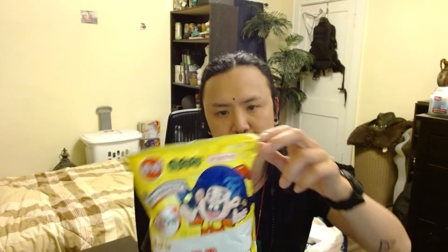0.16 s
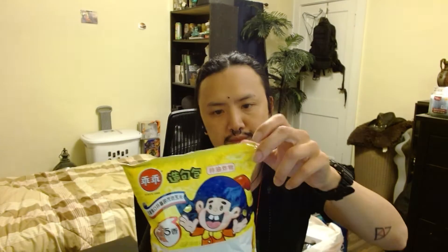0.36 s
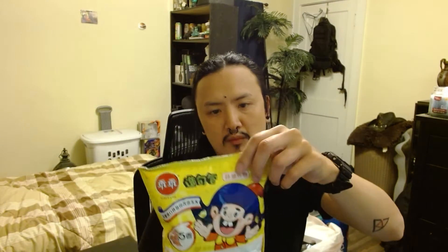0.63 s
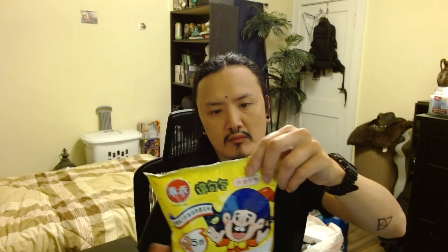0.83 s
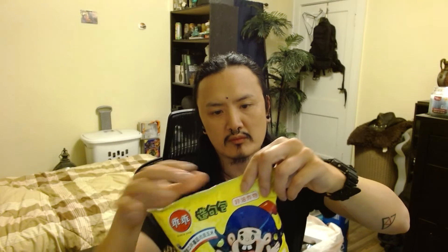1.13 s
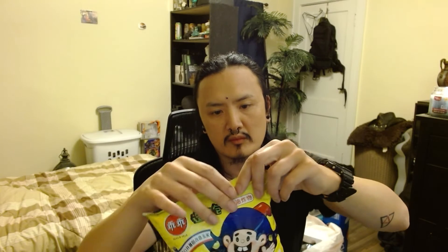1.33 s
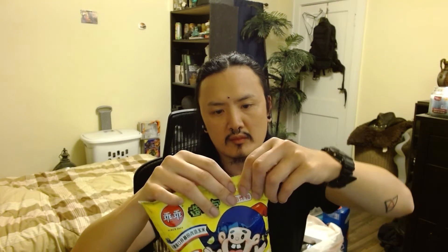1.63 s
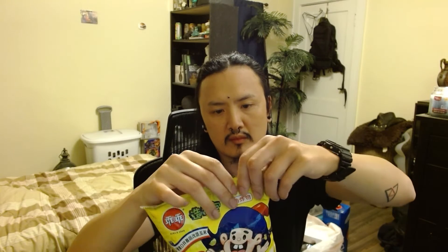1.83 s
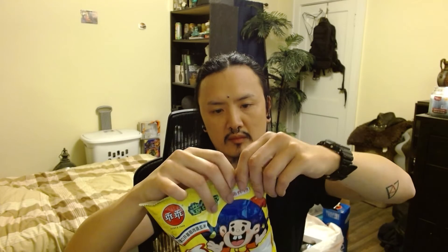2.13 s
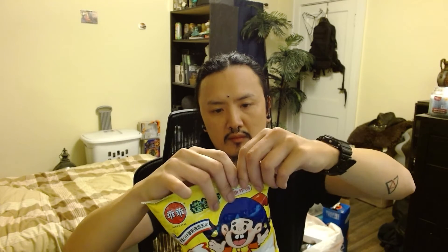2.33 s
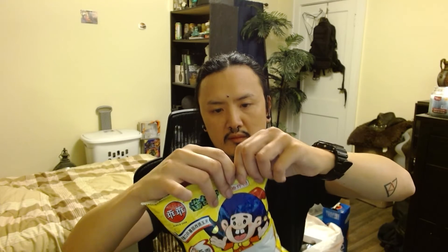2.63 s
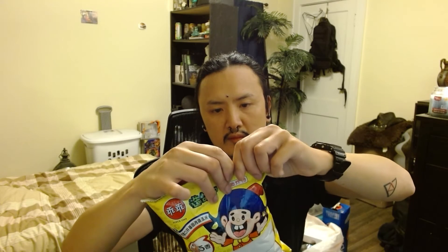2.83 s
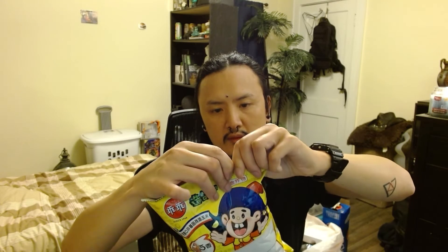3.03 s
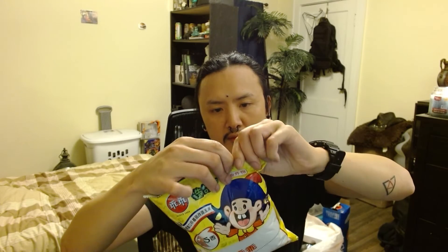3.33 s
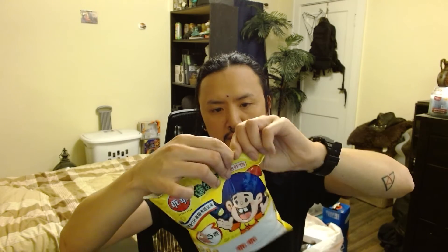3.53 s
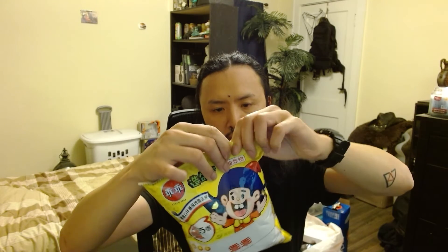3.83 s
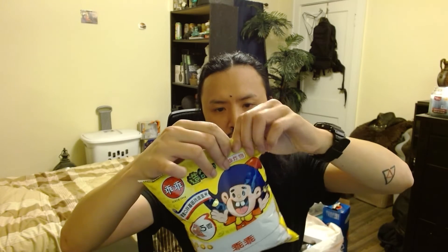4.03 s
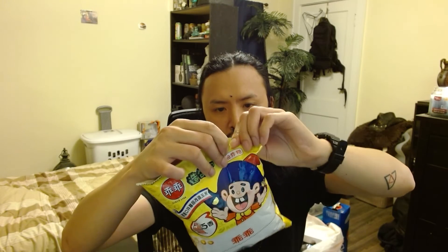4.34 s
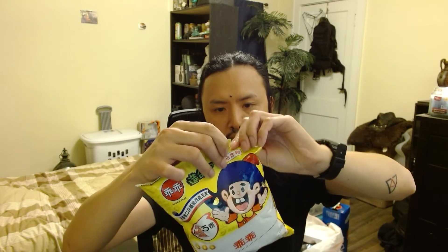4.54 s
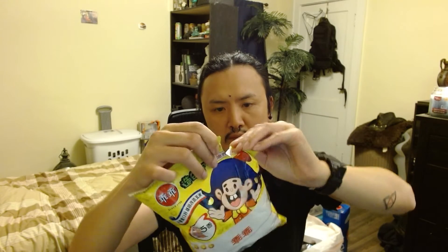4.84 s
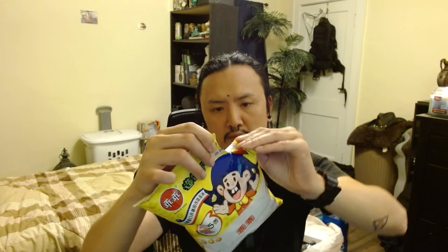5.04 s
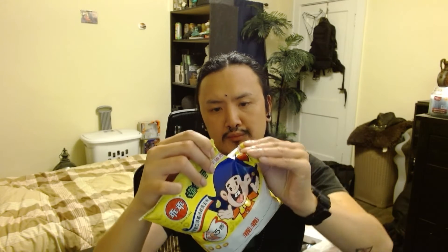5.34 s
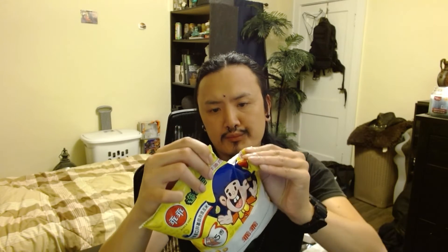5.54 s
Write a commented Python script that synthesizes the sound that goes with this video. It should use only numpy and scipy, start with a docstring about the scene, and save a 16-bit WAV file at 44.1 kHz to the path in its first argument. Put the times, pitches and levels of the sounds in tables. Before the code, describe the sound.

A crisp plastic snack bag crinkles and snaps irregularly as hands grip and tug it in a small room over faint fan rumble.

```python
"""Plastic snack bag handled at a desk

Hands grip and pull the bag in a small furnished bedroom, near a webcam microphone.
Buckling creases snap: resonant noise bursts at listed times. Random tiny pops form a patter of crackles.
Decaying noise tails are the walls' answer; shaped steady noise is a computer fan rumbling underneath."""
import sys
import numpy as np
from scipy import signal
from scipy.fft import rfft, irfft, next_fast_len
from scipy.io import wavfile
from scipy.ndimage import uniform_filter1d

SR = 44100
rng = np.random.default_rng(int(sys.argv[2]) if len(sys.argv) > 2 else 0)


def wrap_up_sound(samples):
    """Save the sound to the file named by the first command line argument, as 16-bit audio."""
    columns = np.atleast_2d(samples).T
    # keep every value between -1 and 1, then stretch to whole-number steps
    tamed = np.clip(columns, -1, 1)
    steps = np.round(tamed * 32767).astype(np.int16)
    wavfile.write(sys.argv[1], SR, steps)


N = 250488

# snaps of the film: t/s, panel f/Hz, panel level/dB, crease level/dB, thump level/dB
FILM_SNAPS = [(0.0166, 1110, -32.5, -34, -25), (0.0788, 930, -38, -34.5, -26.5),
              (0.2643, 2630, -24, -31, -35.5), (0.2687, 1560, -24.5, -34, -35.5),
              (0.33, 900, -54.5, -46, -36), (0.3633, 1830, -10, -18, -16), (0.3786, 980, -15.5, -26, -22.5),
              (0.3938, 890, -26, -39, -25), (0.4379, 1100, -28.5, -28.5, -29), (0.4769, 800, -16, -15, -39),
              (0.4889, 1220, -20.5, -29, -27), (0.5127, 1400, -23.5, -21.5, -28.5),
              (0.5372, 1130, -22, -45, -37), (0.5686, 1280, -28, -35, -39), (0.621, 780, -39, -58, -47),
              (1.0802, 1240, -18.5, -21, -26), (1.0888, 1910, -26, -26, -33),
              (1.102, 1840, -16.5, -16.5, -24), (1.16, 1500, -31, -45, -39),
              (1.1885, 1550, -5.5, 0.5, -18.5), (1.216, 1390, -24, -25, -43),
              (1.2395, 1520, -18.5, -10, -26.5), (1.2898, 602, -12.5, -23, -24),
              (1.3452, 1420, -13.5, -26, -22.5), (1.3516, 1760, -26, -24.5, -53.5),
              (1.3845, 1350, -13, -17.5, -27.5), (1.4262, 2230, -27.5, -24, -44),
              (1.512, 1480, -24.5, -32.5, -33), (1.5536, 1590, -10.5, -10.5, -18),
              (1.6359, 1650, -28, -30, -32), (1.656, 935, -25.5, -26.5, -27), (1.6833, 890, -24, -49, -43),
              (1.7448, 1300, -21, -23, -28), (1.8216, 900, -15, -23.5, -35), (1.8581, 1370, -16, -21, -37),
              (1.8875, 2040, -23, -19, -26.5), (1.9463, 2070, -25.5, -35, -37),
              (1.9813, 1110, -26.5, -51, -29), (2.0094, 1270, -26, -35, -55),
              (2.0569, 1560, -12.5, -15.5, -21), (2.0813, 846, -24, -42, -45),
              (2.0937, 1820, -19, -14.5, -32), (2.1194, 2420, -30, -21.5, -30),
              (2.1425, 1080, -19, -39, -43), (2.1559, 760, -18, -25.5, -23.5),
              (2.1705, 1600, -13.5, -18.5, -46), (2.211, 1140, -21.5, -33, -26),
              (2.223, 1510, -31, -25.5, -40), (2.2871, 1140, -19.5, -49, -25.5),
              (2.2982, 810, -24, -25.5, -20), (2.3327, 1310, -22.5, -46, -33),
              (2.3918, 1150, -17, -44, -43), (2.4208, 1270, -9.5, -13, -26.5),
              (2.4667, 1400, -21.5, -34, -36), (2.4983, 1180, -15.5, -30, -43),
              (2.5929, 1880, -25.5, -21, -22.5), (2.6038, 2530, -16.5, -22.5, -21),
              (2.6199, 1410, -12, -27, -30), (2.633, 965, -19, -51, -32), (2.6613, 1350, -14, -17, -49),
              (2.6651, 1450, -24, -20.5, -37.5), (2.7836, 1530, -13, -35.5, -43),
              (2.7939, 2210, -6.5, -22, -59), (2.8814, 1170, -19.5, -38, -37), (2.8888, 970, -10, -8, -26),
              (2.928, 1640, -17, -35, -44), (2.9464, 1090, -20.5, -19.5, -42),
              (3.222, 1490, -27.5, -45, -32), (3.2335, 1060, -13, -22, -20),
              (3.2436, 1540, -15, -38, -25.5), (3.2617, 2530, -22, -14, -24), (3.275, 2120, -9, -12, -21),
              (3.2816, 910, -12, -23, -35), (3.2955, 1420, -15, -35, -45), (3.3974, 2150, -28, -43.5, -39),
              (3.5879, 1850, -29, -32, -35.5), (3.6607, 1000, -24.5, -39, -32),
              (3.6963, 1460, -18, -26, -50), (3.8111, 2280, -22, -22, -49), (3.8637, 2540, -47, -29, -61),
              (3.9074, 1730, -26, -38, -51), (3.9507, 980, -25.5, -34, -46), (3.962, 2500, -45, -28.5, -41),
              (3.9828, 1450, -36, -18.5, -48), (4.0135, 2630, -8.5, -8.5, -20.5),
              (4.1579, 1680, -17.5, -20, -25.5), (4.188, 2090, -30, -36, -51),
              (4.216, 2350, -22.5, -18.5, -29), (4.251, 2500, -30, -37, -35), (4.2932, 1560, -16, -21, -27),
              (4.3228, 1490, -16.5, -24, -16), (4.3473, 1400, -16, -20, -26), (4.366, 690, -27, -25, -30),
              (4.402, 1200, -35, -18, -22), (4.4064, 2040, -18, -13, -23),
              (4.4192, 1200, -21.5, -18, -16.5), (4.434, 1410, -13, -29, -14),
              (4.4448, 1340, -20, -8.5, -20), (4.4594, 2000, -10, -16, -23.5), (4.4639, 1790, -9, -13, -19),
              (4.4807, 1570, -29, -32, -21), (4.5044, 1210, -26, -26, -24),
              (4.545, 1280, -18.5, -23.5, -24.5), (4.582, 960, -11, -15.5, -15.5),
              (4.59, 950, -32, -20, -22), (4.6247, 670, -13.5, -22.5, -16.5),
              (4.6419, 1820, -29, -17.5, -36), (4.6619, 2200, -13.5, -12, -22.5),
              (4.6854, 1355, -6, -15, -31), (4.6983, 910, -16, -5, -14), (4.7509, 1930, -15.5, -13.5, -22),
              (4.7622, 1850, -17.5, -21.5, -28), (4.7677, 1940, -24, -33, -23),
              (4.7867, 1420, -19.5, -15, -25), (4.919, 1630, -34, -32.5, -47),
              (5.0375, 1500, -26, -21, -42), (5.1216, 740, -20.5, -42, -14.5),
              (5.1991, 2510, -30, -22, -48), (5.254, 1140, -13, -21.5, -22), (5.3114, 1040, -21, -16, -42),
              (5.3242, 1120, -22, -18.5, -33), (5.3868, 1900, -20, -33, -25),
              (5.4061, 1290, -13.5, -19.5, -25), (5.4517, 1870, -24.5, -31, -55),
              (5.483, 800, -38, -20, -21), (5.5106, 1860, -21, -25.5, -30), (5.5978, 1770, -17.5, -16, -49),
              (5.6513, 1180, -26.5, -22.5, -31), (5.6666, 2230, -25, -29.5, -31)]


def snaps():
    """A buckling crease ticks brightly, rings the panel of film around it and thumps the air in the bag."""
    t_s, panel_hz, panel_db, crease_db, thump_db = np.transpose(FILM_SNAPS)
    ref_t60_s, ref_crease_db, shortening_per_db = 0.025, -19.5, 0.0062  # harder ticks die faster
    t60_s = ref_t60_s * np.exp(-shortening_per_db * (crease_db - ref_crease_db))
    t60_s = np.clip(t60_s, 0.004, 0.09)
    panel = amp(panel_db)[:, None] * bursts(panel_hz[:, None], sharp=1.05, t60_s=t60_s, kick=12.6)
    crease = amp(crease_db)[:, None] * bursts(4400, sharp=0.79, t60_s=t60_s * 0.53, kick=4.2)
    thump = amp(thump_db)[:, None] * bursts(348, sharp=0.49, t60_s=t60_s * 2.0, kick=13.2)
    return place(t_s, panel + crease + thump)


def crackle(count=4000):
    """Tiny creases pop at random, many small and few large; louder under a firm grip and after a snap."""
    # how hard the hands work the bag: t/s, crackle level/dB
    grip_points = [(0, -37), (.2, -62.5), (.45, -39), (.6, -51.5), (.9, -74), (1.03, -56.5), (1.078, -33),
                   (1.22, -45.5), (1.4, -57), (1.8, -54), (2.3, -44), (2.65, -41.5), (3.0, -56.5),
                   (3.2, -58), (3.279, -30.5), (3.55, -58), (3.95, -48), (4.389, -43), (4.41, -25),
                   (4.55, -38), (4.7, -35), (4.85, -50), (5.1, -42), (5.4, -37), (5.55, -46.5),
                   (5.68, -31.5)]
    # spectral weighting of the patter: f/Hz, relative level/dB
    film_response = [(120, -30.5), (250, -11), (450, -2.5), (950, -6.5), (2000, -8.5), (4500, -10),
                     (7300, -4)]
    when, size, pitch, decay = rng.random((count, 4)).T
    strength = amp(np.minimum(-5.5 * np.log(1 - size), 19))[:, None]
    pitch_hz = 400 * 16 ** pitch[:, None]
    t60_s = 0.0057 + 0.012 * decay
    pops = strength * bursts(pitch_hz, sharp=0.74, t60_s=t60_s, kick=3.0, samples=512)
    raw_patter = place(when * N / SR, pops)
    patter = unit(filtered(raw_patter, lambda hz: amp(along(film_response, hz))))
    grip = amp(np.interp(np.arange(N) / SR, *np.transpose(grip_points)))
    return np.sqrt(grip ** 2 + settling_power()) * patter


def settling_power():
    """Power of the crackle that each snap sets off and that dies away behind it."""
    t_s, _, panel_db, crease_db, _ = np.transpose(FILM_SNAPS)
    below_snap_db, t60_s = -21, 0.13
    crease_offset_db = -1.5  # a tick sets off less crackle than a panel of the same peak
    snap_db = np.maximum(panel_db, crease_db + crease_offset_db)
    lag_s = np.arange(SR // 2) / SR
    level_db = snap_db[:, None] + below_snap_db - 60 * lag_s / t60_s
    return place(t_s, amp(level_db) ** 2)


def bursts(hz, sharp, t60_s, kick, samples=2048):
    """One row per burst: a kick and dying, stuttering noise pass twice through a mode; loudest moment at 1."""
    lag_s = np.arange(samples) / SR
    count = len(t60_s)
    steps = rng.standard_normal((count, samples // 32))
    stutter = amp(6.36 * np.repeat(steps, 32, axis=1))  # creases give way in jerks
    envelope = amp(-60 * lag_s / t60_s[:, None]) * (1 - np.exp(-lag_s / 0.00022))
    push = rng.standard_normal((count, samples)) * stutter * envelope
    push[:, 8] += kick
    response = resonance(np.fft.rfftfreq(samples, 1 / SR), hz, sharp) ** 2
    rows = irfft(rfft(push) * response, samples)
    power = uniform_filter1d(rows ** 2, size=64, axis=1)
    return rows / np.sqrt(2 * power.max(axis=1, keepdims=True))


def resonance(f, hz, sharp):
    """Causal response of one mode, gain 1 at its centre."""
    damping = 1j * f * hz / sharp
    return damping / (hz * hz - f * f + damping)


def room(x):
    """Diffuse wall reflections: a decaying noise tail, drawn afresh every 1/8 s as the bag moves."""
    # reverberation: f/Hz, t60/s
    room_decay = [(200, 0.48), (600, 0.31), (1500, 0.23), (6000, 0.25)]
    out = x.copy()
    step, delay = SR // 8, 150  # samples
    for start in range(0, N, step):
        hz, lag_s, bins = signal.stft(rng.standard_normal(SR // 3), SR, nperseg=256)
        decay = amp(-60 * lag_s / along(room_decay, hz)[:, None])
        tail = signal.istft(bins * decay, SR, nperseg=256)[1]
        wet = signal.fftconvolve(x[start:start + step], tail / np.linalg.norm(tail))
        part = out[start + delay:start + delay + len(wet)]  # view: adds into out
        part += amp(-11) * wet[:len(part)]
    return out


def fan():
    """Computer fan: steady noise shaped to rumble and hiss, strongest near 60 Hz."""
    # fan spectrum: f/Hz, relative level/dB
    fan_spectrum = [(20, -14.5), (36, -1), (59, 0.5), (75, -5.5), (140, -16.5), (240, -11), (300, -15.5),
                    (640, -28.5), (2500, -44.5), (7500, -44.5)]
    noise = filtered(rng.standard_normal(N), lambda hz: amp(along(fan_spectrum, hz)))
    return amp(-46.0) * unit(noise)


def amp(db):
    """dB to gain."""
    return 10 ** (np.asarray(db) / 20)


def unit(x):
    """Scaled to rms 1."""
    return x / np.sqrt(np.mean(x ** 2) + 1e-20)


def along(points, hz):
    """Interpolates (f/Hz, value) points on a log frequency axis."""
    f, values = np.transpose(points)
    return np.interp(np.log(hz + 1), np.log(f + 1), values)


def filtered(x, response):
    """Spectrum of x times a response of frequency."""
    size = next_fast_len(N + SR // 2)
    return irfft(rfft(x, size) * response(np.fft.rfftfreq(size, 1 / SR)), size)[:N]


def place(times_s, rows):
    """Sums the rows at their start times."""
    at = np.round(times_s * SR).astype(int)[:, None] + np.arange(rows.shape[1])
    return np.bincount(at.ravel(), rows.ravel(), N + rows.shape[1])[:N]


def scene():
    """The bag, with the hollow ring of its whole pouch, in the room over the fan."""
    def pouch(f):
        return 1 + 1.2 * resonance(f, hz=930, sharp=14)

    bag = filtered(snaps() + crackle(), pouch)
    return (room(bag) + fan())[None]


def record(dry):
    """The input stage rounds off the tallest peaks, rolls off the treble and cuts all above its band limit."""
    ceiling, band_limit_hz = 0.65, 8700
    soft = dry[0] / (1 + np.abs(dry[0] / ceiling) ** 4) ** 0.25

    def treble_cut(hz):
        gentle = (1 + (hz / 5600) ** 6) ** -0.5
        steep = (1 + (hz / 7400) ** 60) ** -0.5
        return gentle * steep * (hz < band_limit_hz)

    return filtered(soft, treble_cut)[None]


dry = scene()
out = record(dry)
wrap_up_sound(out)
```